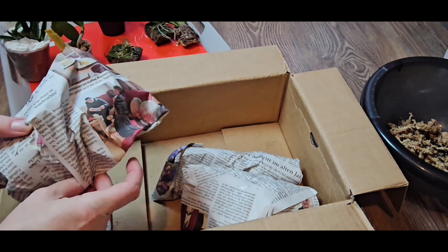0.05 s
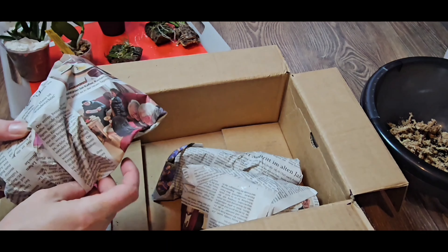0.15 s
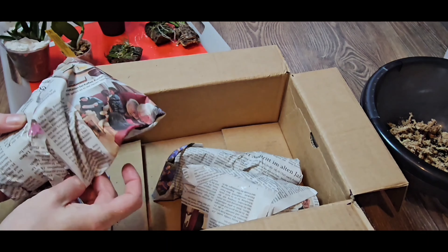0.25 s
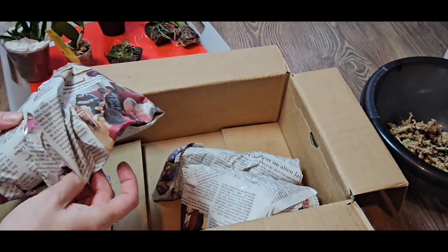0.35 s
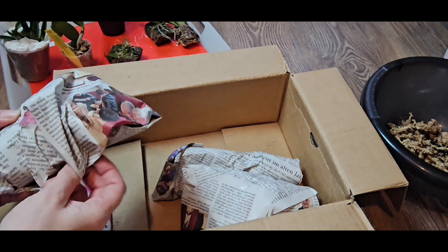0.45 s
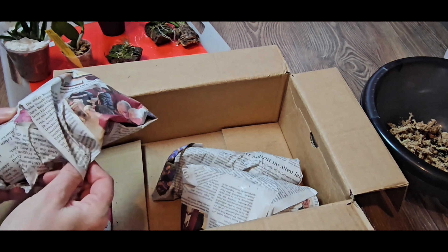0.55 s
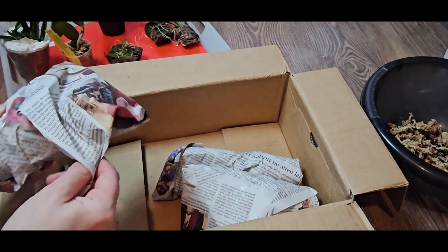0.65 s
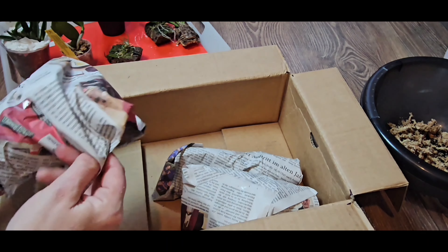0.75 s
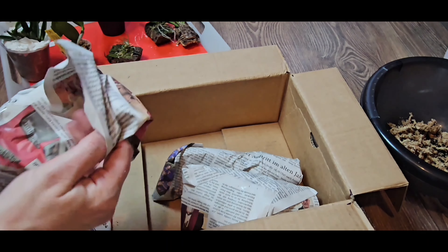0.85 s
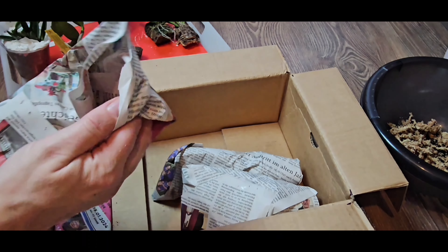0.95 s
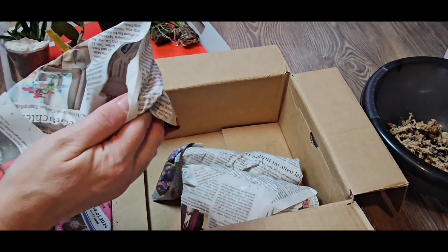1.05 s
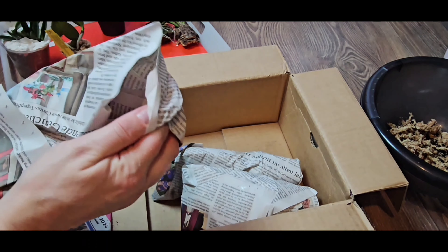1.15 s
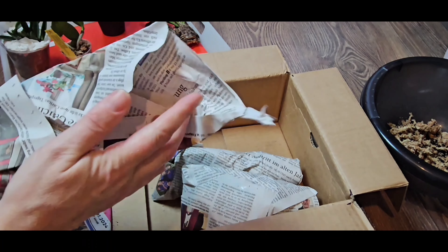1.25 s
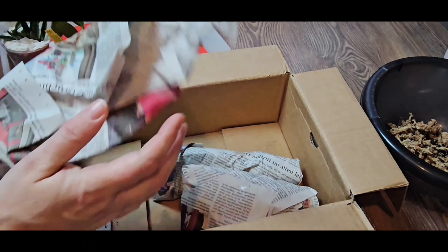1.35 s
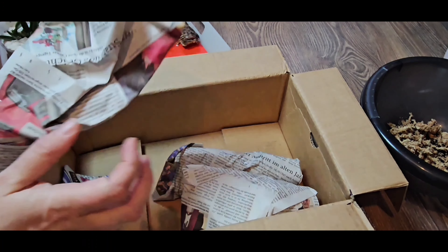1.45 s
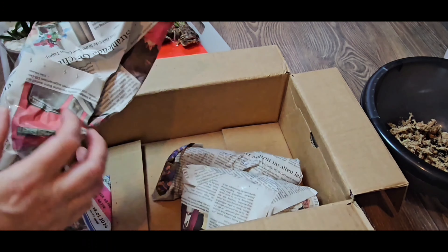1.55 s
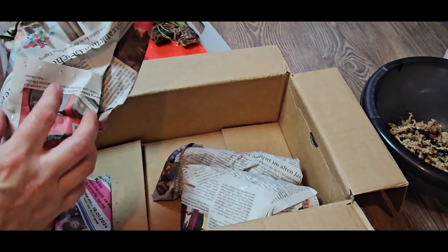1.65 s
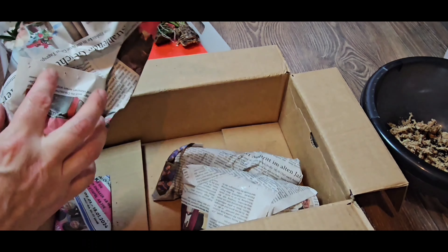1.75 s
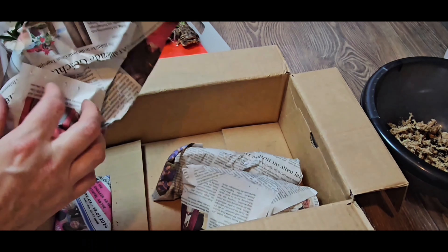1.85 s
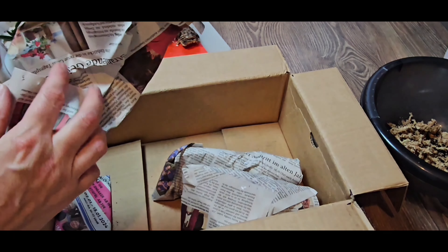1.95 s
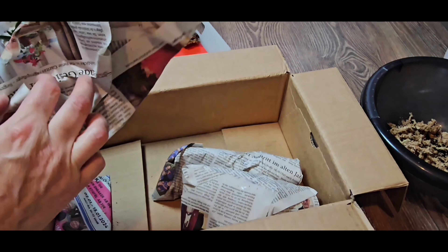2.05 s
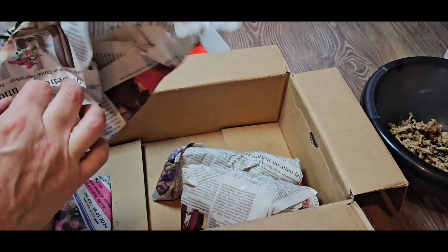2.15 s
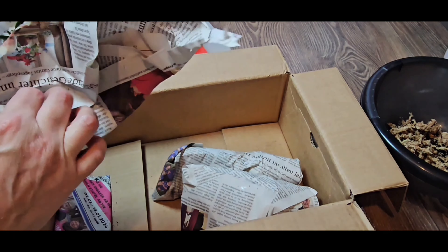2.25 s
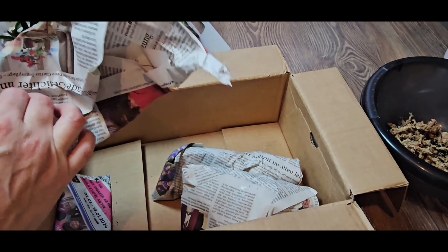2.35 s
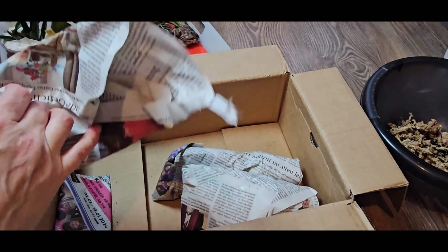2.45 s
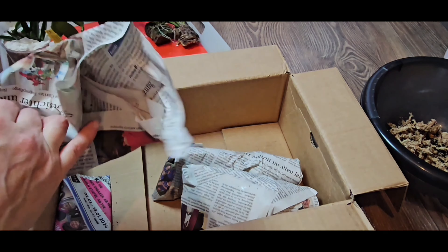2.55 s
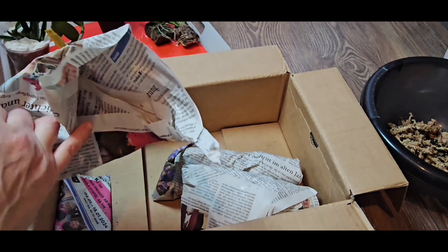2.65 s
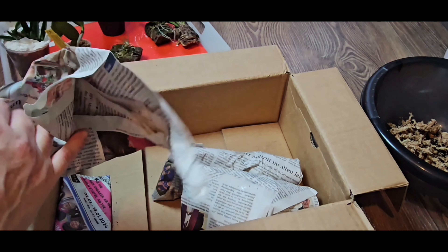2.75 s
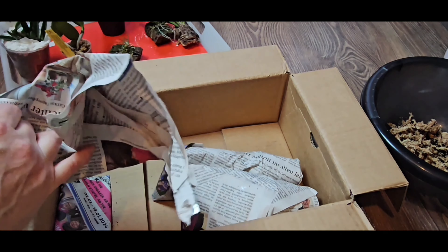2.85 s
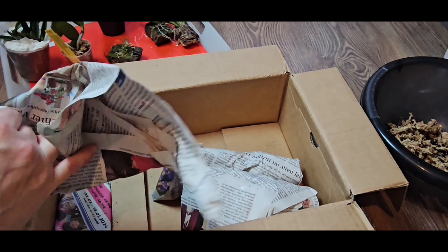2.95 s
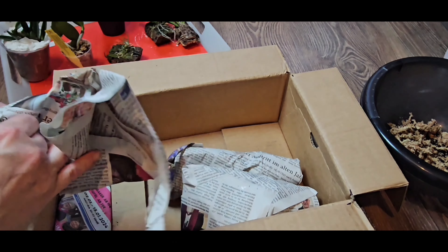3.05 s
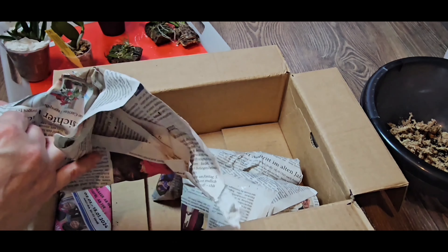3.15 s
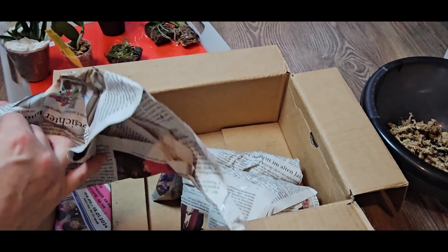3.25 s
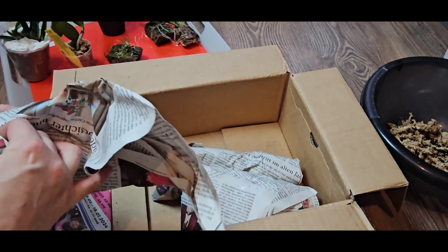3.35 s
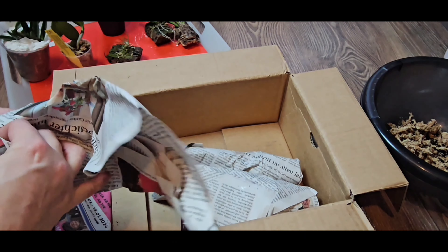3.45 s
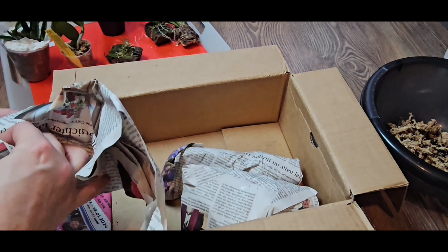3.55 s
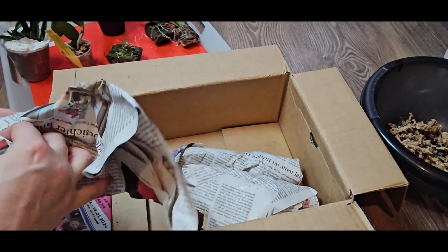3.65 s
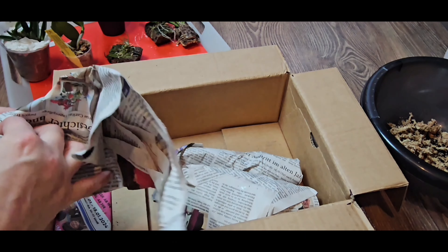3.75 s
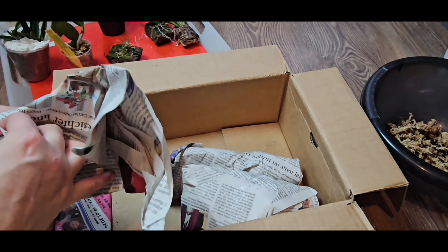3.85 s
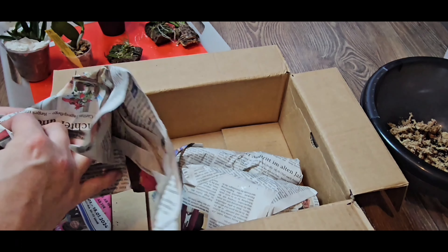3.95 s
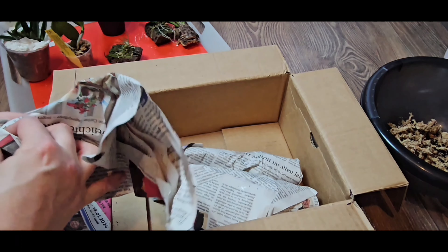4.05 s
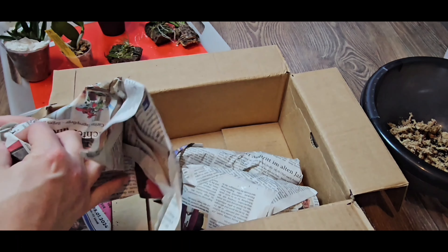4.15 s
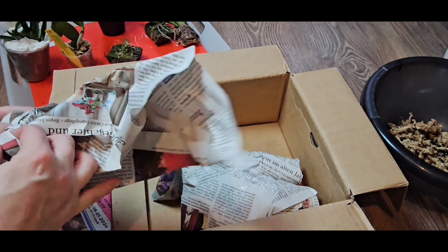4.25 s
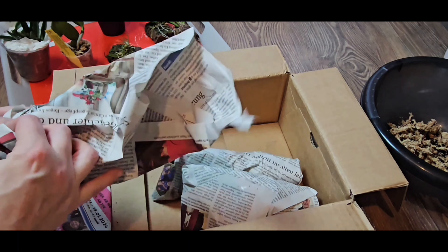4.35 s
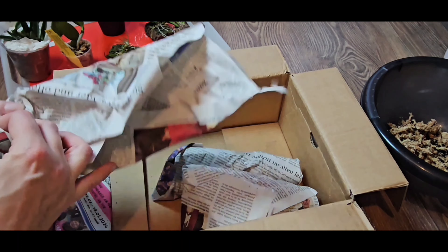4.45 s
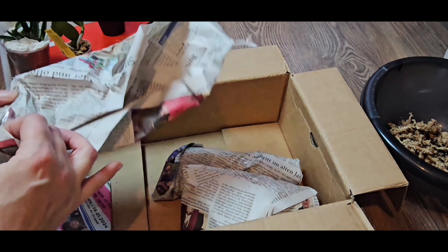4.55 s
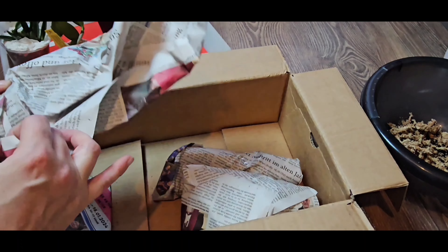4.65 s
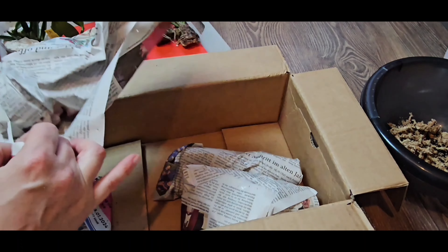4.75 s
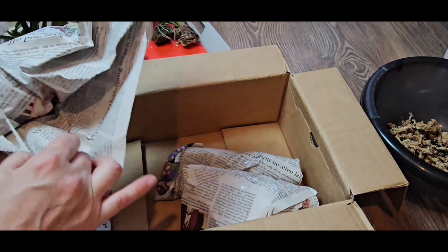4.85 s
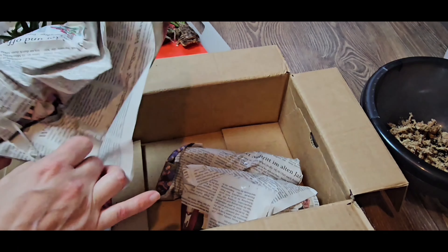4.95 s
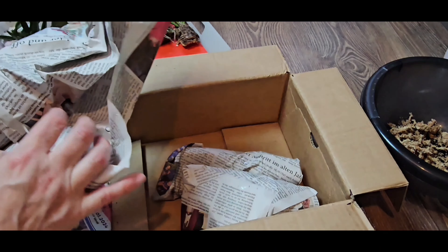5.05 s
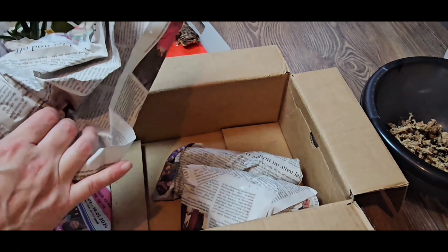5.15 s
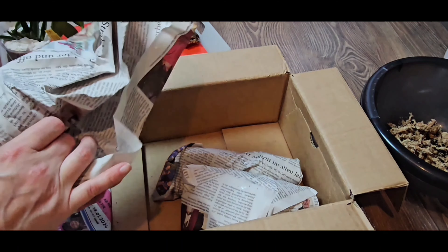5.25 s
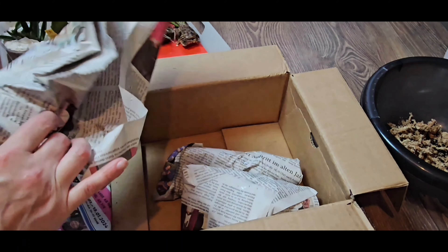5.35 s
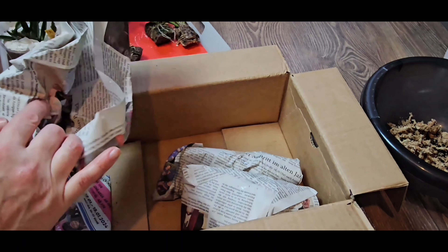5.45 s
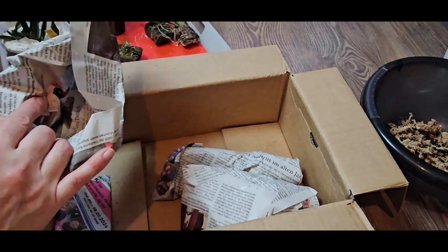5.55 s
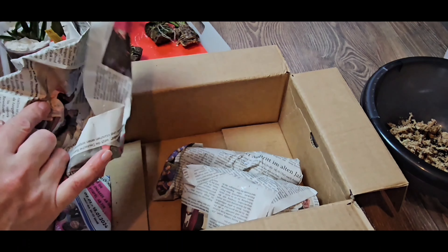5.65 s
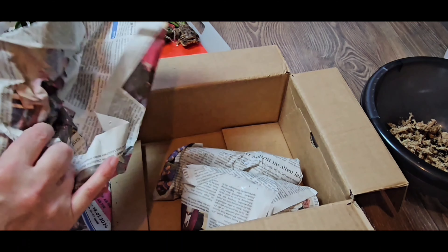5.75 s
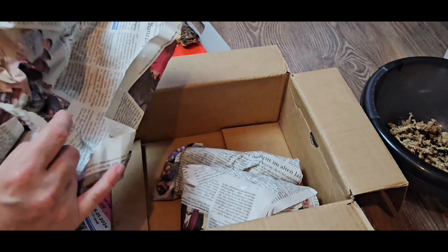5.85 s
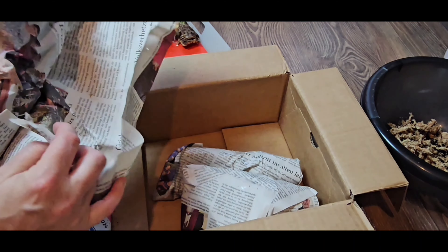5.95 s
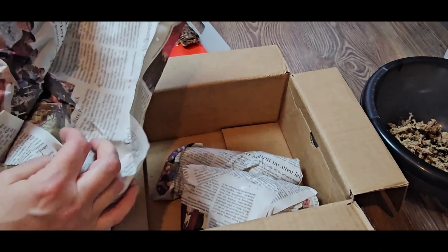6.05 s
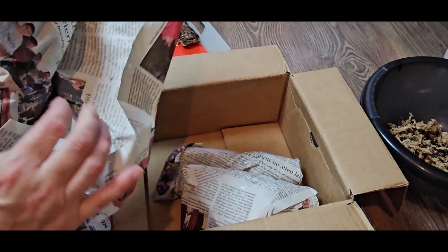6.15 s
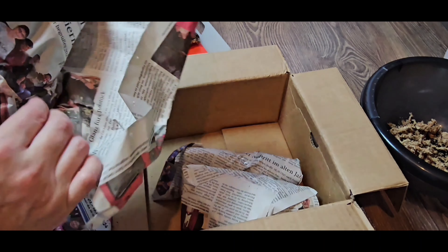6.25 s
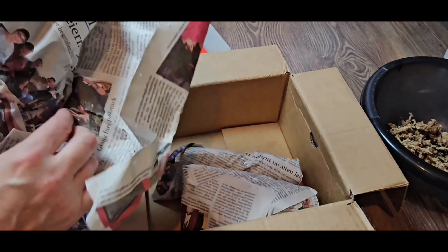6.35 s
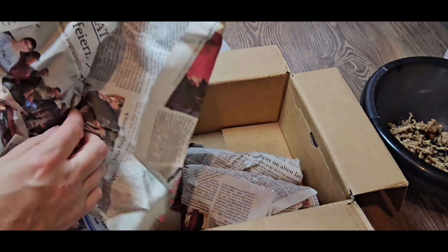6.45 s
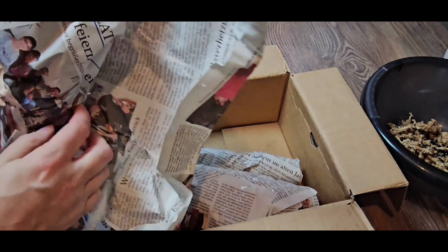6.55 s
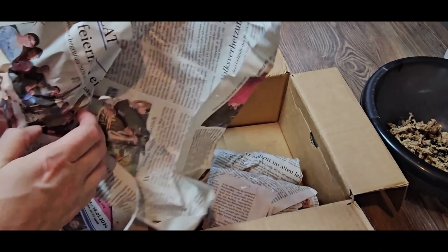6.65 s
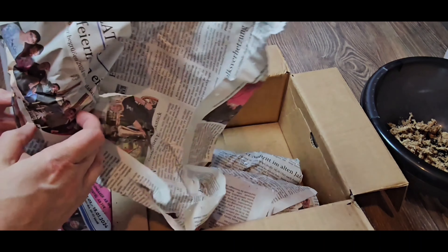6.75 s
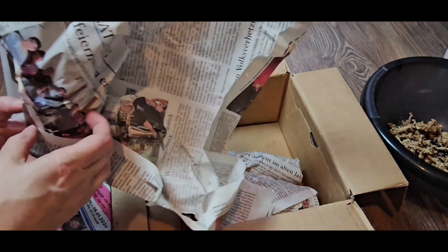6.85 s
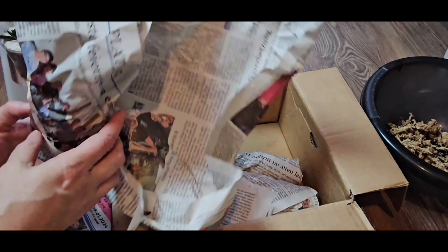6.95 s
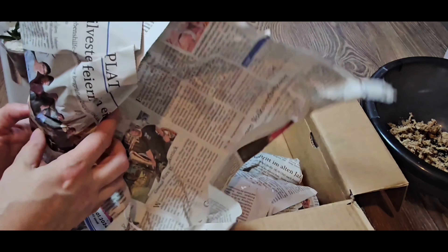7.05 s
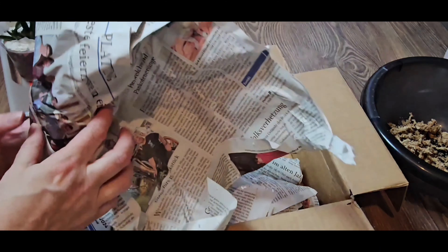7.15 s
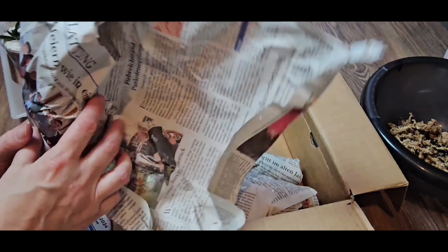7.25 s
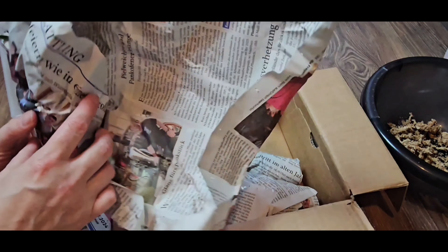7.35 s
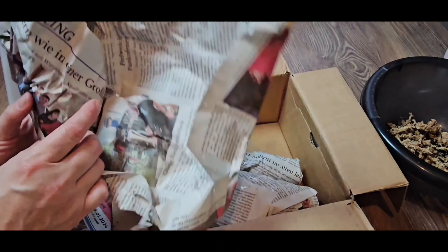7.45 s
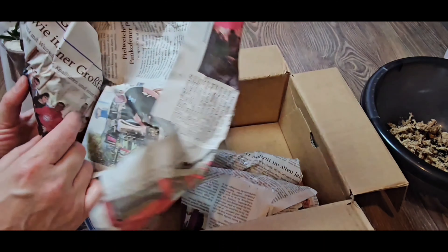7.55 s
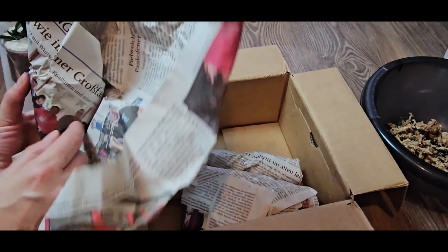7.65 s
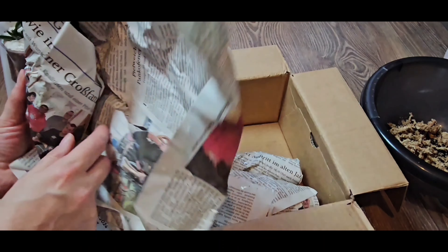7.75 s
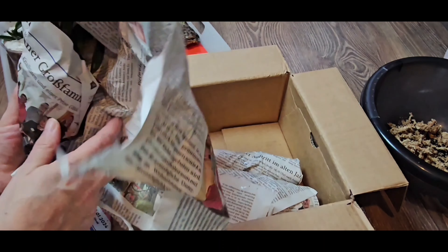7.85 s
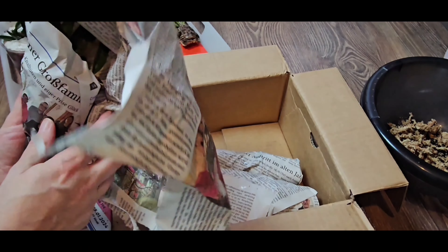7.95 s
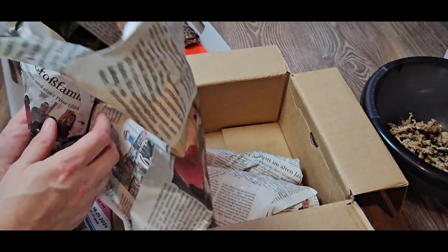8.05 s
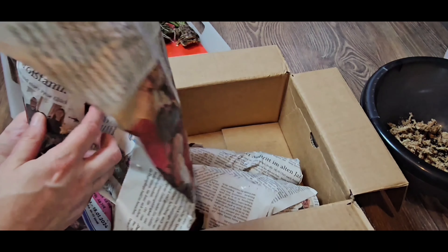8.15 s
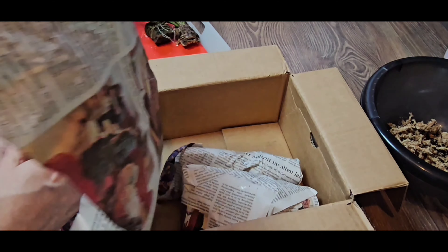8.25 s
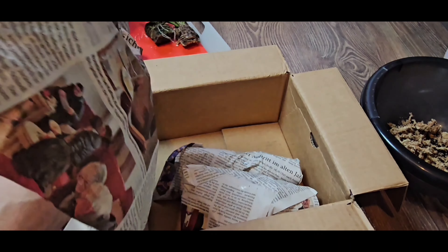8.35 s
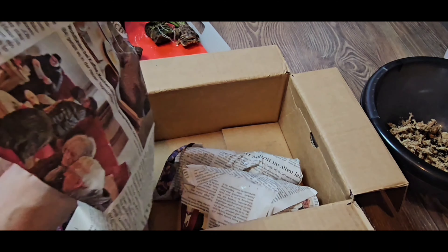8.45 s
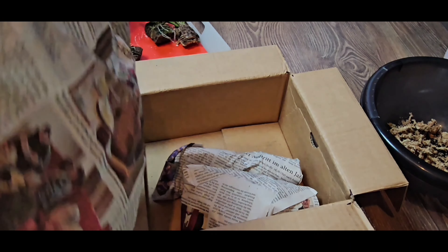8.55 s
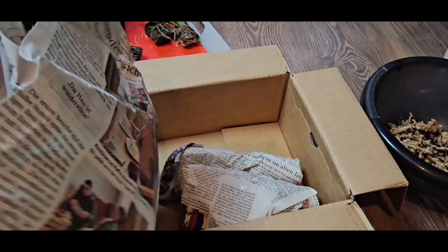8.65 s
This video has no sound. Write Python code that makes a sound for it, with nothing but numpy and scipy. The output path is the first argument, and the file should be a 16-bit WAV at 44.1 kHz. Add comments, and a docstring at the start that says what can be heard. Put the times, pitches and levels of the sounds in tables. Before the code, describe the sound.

Irregular handfuls of crinkling paper, first short squeezes, a quiet gap, then denser rustling with a few soft dull bumps of the bundle. A tiny tear zips by; later a strong pull rips and flutters the sheet, followed by a sinking hollow whoosh and fine rasp. Snapping and rustling continue to the end. Close, dry, centred indoor pickup with barely audible room hiss.

```python
"""A quiet room with faint noise and a thin high whine: close by, hands unwrap a potted plant from newspaper.
Dense, clustered buckles ring small facets, folds and wide panels of the sheet over a grain of rubbing fibres.
Stiff creases snap and wide folds pop as short noise bursts through resonances; layers slide, a few fibres tear.
Once the sheet is yanked free: a rip and flutter, then a swing of noise with a sinking hollow note and a rasp. A
few soft low thuds sound now and then, and the room answers with a diffuse decaying tail."""
import sys
import numpy as np
from scipy import signal
from scipy.fft import rfft, irfft, next_fast_len
from scipy.io import wavfile
from scipy.ndimage import uniform_filter1d, map_coordinates

SR = 44100
rng = np.random.default_rng(int(sys.argv[2]) if len(sys.argv) > 2 else 0)


def to_wav(sig):
    """Store sig (one row per channel, or 1-D mono) as 16-bit WAV at the path in sys.argv[1].

    Samples outside -1..1 are clipped; the rate is SR.
    """
    pcm = np.clip(np.atleast_2d(sig), -1, 1) * 32767
    pcm = np.round(pcm).astype(np.int16)
    wavfile.write(sys.argv[1], SR, pcm.T)  # frames by channels


N = 383978


def amp(db):
    """Decibels to gain."""
    return 10 ** (np.asarray(db) / 20)


def decibels(gain):
    """Gain to decibels."""
    return 20 * np.log10(gain)


def unit(x):
    """Scale to rms 1."""
    return x / np.sqrt(np.mean(x ** 2) + 1e-20)


def along(points, hz):
    """Read (frequency, value) points on a log frequency axis."""
    f, v = np.transpose(points)
    return np.interp(np.log(hz + 1), np.log(f), v)


def wobble(rate):
    """A smooth random curve through rate knots a second."""
    knots = rng.standard_normal(int(N * rate / SR) + 4)
    return map_coordinates(knots, [np.arange(N) * rate / SR], order=2)


def coloured(x, gain, size=2048):
    """Causal minimum-phase filter with the given gain over frequency."""
    cepstrum = irfft(np.log(np.maximum(gain(np.fft.rfftfreq(size, 1 / SR)), 1e-6)))
    cepstrum[1:size // 2] *= 2
    cepstrum[size // 2 + 1:] = 0
    impulse = irfft(np.exp(rfft(cepstrum)))
    return signal.fftconvolve(x, impulse)[:len(x)]


# colour of the room's background, overall level set apart: pitch_hz [Hz], density_db [dB per Hz]
BACKGROUND_COLOUR = [(25, -27), (70, 3), (130, 3.5), (300, -0.5), (1000, -10.5), (4000, -13.5),
                     (10000, -15), (15500, -14)]


def background(level_db=-77, whine_db=-86.0, whine_hz=13500, width_hz=150):
    """Faint room noise with a narrow noise band as a thin high whine."""
    air = coloured(rng.standard_normal(N), lambda f: amp(along(BACKGROUND_COLOUR, f)))
    whine = coloured(rng.standard_normal(N), lambda f: 1 / (1 + ((f - whine_hz) / width_hz) ** 2))
    return amp(level_db) * unit(air) + amp(whine_db) * unit(whine)


# how long the room rings: pitch_hz [Hz], decay_t60_s [s]
ROOM_DECAY = [(200, 0.19), (2000, 0.06), (12000, 0.9)]


def room(x):
    """A diffuse answer of the room: a noise tail in which each frequency dies at its own speed."""
    hz, t, z = signal.stft(rng.standard_normal(SR // 2), SR, nperseg=256)
    fade = amp(-60 * t / along(ROOM_DECAY, hz)[:, None])
    tail = signal.istft(z * fade, SR, nperseg=256)[1]
    delayed = np.pad(x, (SR // 250, 0))  # 4 ms before the answer starts
    return signal.fftconvolve(delayed, tail / np.linalg.norm(tail))[:N]


# what the crumpled sheet radiates, relative colour only: pitch_hz [Hz], density_db [dB per Hz]
SHEET_COLOUR = [(60, -11), (200, -10.5), (350, 0.5), (480, -2.5), (620, 1.5), (800, -3.5), (1050, -6.5),
                (1600, 0.5), (2500, -2), (5700, 4), (7300, 1.5), (9500, -14.5), (15500, -10.5)]


def sheet_gain(f):
    """Gain of the sheet as a radiator over frequency."""
    return amp(along(SHEET_COLOUR, f))


def sheet(x, lo_hz, hi_hz, order=14):
    """Sound given off by the parts of the sheet that ring between two frequencies."""
    def band(f):
        low_side = 1 + (lo_hz / (f + 1)) ** (2 * order)
        high_side = 1 + (f / hi_hz) ** (2 * order)
        return 1 / np.sqrt(low_side * high_side)
    return coloured(x, lambda f: sheet_gain(f) * band(f))


def crease(slip, hz, width_hz, crack_db):
    """A slip rings one patch of paper over a broad crack; it carries the energy of 4 ms at rms 1."""
    def patch(f):
        resonance = 1 / (1 + ((f - hz) / width_hz) ** 2)
        above_bass = f ** 2 / (f ** 2 + (hz / 10) ** 2)  # a small patch gives off little bass
        return resonance + amp(crack_db) * above_bass
    ring = coloured(slip, lambda f: sheet_gain(f) * patch(f))
    return np.sqrt(SR / 250) * ring / np.linalg.norm(ring)


# soft low knocks: start_s [s], level_db [dB, before gain_db]
BUMP_EVENTS = [(1.358, -49), (1.439, -53.5), (3.02, -45.5), (8.007, -47.5)]


def bumps(gain_db=-5, rise=0.0022, t60=0.25, lo_hz=110, hi_hz=300):
    """A soft low thud of decaying noise."""
    t = np.arange(N) / SR
    thud = unit(sheet(rng.standard_normal(N), lo_hz, hi_hz, order=3))
    envelope = np.zeros(N)
    for start_s, level_db in BUMP_EVENTS:
        envelope += np.clip((t - start_s) / rise, 0, 1) * amp(level_db - 60 * np.abs(t - start_s) / t60)
    return amp(gain_db) * envelope * thud


# the loose sheet swings through the air: its time, level and hollow note from first to last
SWING_S, SWING_LENGTH_S, SWING_DB, SWING_FROM_HZ, SWING_TO_HZ = 4.56, 0.5, -55, 610, 354


def swing(octaves=0.34, rise=0.011, fade_db_per_s=110):
    """The swinging sheet is a band of noise; its note sinks as more of it unfolds."""
    hz, t, z = signal.stft(rng.standard_normal(N), SR, nperseg=1024)
    note = np.interp(t, [SWING_S, SWING_S + SWING_LENGTH_S], [SWING_FROM_HZ, SWING_TO_HZ])
    octaves_off = np.log2((hz[:, None] + 1) / note)
    hum = signal.istft(z * np.exp(-.5 * (octaves_off / octaves) ** 2), SR, nperseg=1024)[1][:N]
    age = np.arange(N) / SR - SWING_S
    db = SWING_DB - fade_db_per_s * np.maximum(age - SWING_LENGTH_S, 0)
    return np.clip(age / rise, 0, 1) * amp(db) * unit(hum)


# how the fingers close on the paper, and how it relaxes after the squeeze
CLOSE_S, RELAX_DB_PER_S = .027, 129


def squeeze(age, length, build_db):
    """Gain of one grip: the fingers close, the force moves by build_db (eases if negative), then lets go."""
    closing = np.clip(age / CLOSE_S, 0, 1)
    slack = np.clip(1 - age / np.abs(length), 0, 1)
    return closing * amp(-build_db * slack - RELAX_DB_PER_S * np.maximum(age - length, 0))


def scrape(level_db=-52, rough_db=4, lo_hz=5200, hi_hz=16000, length=0.47):
    """The swinging sheet drags over the bundle: a fine, bright noise rasp, randomly rough in level."""
    age = np.arange(N) / SR - SWING_S
    rough = amp(rough_db * (wobble(500) + wobble(60)))
    rasp = sheet(rng.standard_normal(N), lo_hz, hi_hz, order=4) * rough
    return amp(level_db) * squeeze(age, length, 0) * unit(rasp)


def tear(middle_s=2.4983, length=0.0022, level_db=-37, note_hz=6700, width_hz=600, crack_db=-15):
    """A few fibres rip in one tiny bright zip, a bell-shaped burst of noise."""
    age = np.arange(N) / SR - middle_s
    slip = rng.standard_normal(N) * np.exp(-(age / length) ** 2)
    return amp(level_db) * crease(slip, note_hz, width_hz, crack_db)


# wide folds popping over, each with its own hollow note:
# start_s [s, before a 1.2 ms delay], level_db [dB, before gain_db], pitch_hz [Hz]
POP_EVENTS = [(0.177, -39.5, 616), (0.74, -39.5, 770), (0.971, -46, 2030), (1.236, -36.5, 620),
              (1.327, -36.5, 1360), (1.358, -29, 990), (1.423, -38, 402), (1.996, -49, 1700),
              (2.027, -47, 1740), (2.299, -36, 645.3), (2.767, -40, 1730), (2.889, -32.5, 662),
              (2.946, -38, 552.4), (3.014, -29.5, 398), (3.093, -34, 606), (3.523, -42, 720),
              (3.616, -34.5, 1570), (3.655, -31, 617), (4.575, -32, 626), (4.653, -33, 790),
              (4.678, -30, 2140), (4.941, -37.5, 371), (5.001, -35, 406), (5.19, -41.5, 1950),
              (5.205, -34.5, 436), (5.683, -35.5, 536), (5.927, -33.5, 627), (6.871, -42.5, 1750),
              (6.901, -39, 598), (7.116, -41, 1900), (7.209, -40, 1530), (8.051, -35.5, 586),
              (8.081, -39, 526.7), (8.107, -40, 350), (8.3, -34.5, 1738), (8.317, -38.5, 705),
              (8.351, -38.5, 610)]
FOLD_T60 = .022  # s, decay of the shiver


def pops(gain_db=-8.0, crack_db=-9, kick_db=24):
    """A wide fold flips over with one kick and a brief shiver of noise."""
    t = np.arange(SR // 10) / SR
    out = np.zeros(N + len(t))
    for start_s, level_db, pitch_hz in POP_EVENTS:
        shiver = rng.standard_normal(len(t)) * amp(-60 * t / FOLD_T60)
        kick = amp(kick_db) * (t == 0)
        soft = coloured(shiver + kick, lambda f: f / (f + 200) / (1 + (f / 3200) ** 4))
        pop = crease(soft, pitch_hz, pitch_hz / 4, crack_db)
        out[int((start_s + .0012) * SR):][:len(t)] += amp(level_db + gain_db) * pop
    return out[:N]


# stiff creases snapping through: start_s [s], level_db [dB, before gain_db]
SNAP_EVENTS = [(0.061, -52), (0.158, -44.5), (0.261, -49.0), (0.336, -44.5), (0.404, -48.5), (0.425, -41),
               (0.502, -36), (0.633, -42.5), (0.701, -42), (0.743, -36), (0.787, -46), (0.971, -48.5),
               (1.135, -43.5), (1.168, -48.0), (1.238, -47.5), (1.279, -49), (1.361, -32), (1.413, -40),
               (1.57, -51), (1.9, -53.5), (1.996, -50.5), (2.13, -54), (2.3, -45), (2.703, -37),
               (2.768, -44), (2.801, -37.5), (2.827, -42), (2.887, -36), (2.89, -37), (2.917, -39.5),
               (3.016, -51), (3.092, -44.5), (3.256, -43.5), (3.344, -46.0), (3.385, -45), (3.511, -52),
               (3.522, -50), (3.567, -49.5), (3.578, -48.5), (3.618, -43.5), (3.656, -43), (3.838, -49),
               (3.929, -50), (4.135, -54), (4.154, -51.5), (4.24, -52), (4.288, -56), (4.324, -43.5),
               (4.587, -39), (4.624, -35.5), (4.655, -30), (4.679, -46), (4.709, -42.5), (4.887, -41),
               (5.041, -42.5), (5.091, -39.5), (5.192, -46), (5.301, -47), (5.403, -42.5), (5.46, -46.5),
               (5.605, -44.0), (5.636, -40.5), (5.684, -39.0), (5.709, -43.5), (5.741, -45.0),
               (5.771, -42.5), (5.794, -48), (5.85, -36.5), (5.895, -37), (6.037, -45), (6.142, -44.5),
               (6.473, -51.5), (6.54, -48.5), (6.622, -50.5), (6.684, -44.5), (6.84, -40), (6.904, -38.5),
               (7.117, -38), (7.211, -47), (7.224, -47.0), (7.598, -46), (7.671, -47), (7.718, -46),
               (7.737, -45), (7.806, -47.0), (7.821, -48.0), (7.894, -48.5), (7.923, -43), (7.955, -35.5),
               (7.959, -35.0), (7.987, -49), (8.013, -38.5), (8.068, -46), (8.111, -36.5), (8.256, -43),
               (8.401, -36), (8.659, -46.5)]
FACET_HZ, FACET_OCTAVES = 5320, 0.21  # the facet a snap rings: usual pitch and its scatter


def snaps(gain_db=0.75, rise=0.00008, length=0.0021, width_hz=1000, crack_db=-11):
    """A stiff crease gives way for a few milliseconds and stops; its facet rings over a broad crack."""
    t = np.arange(SR // 20) / SR
    out = np.zeros(N + len(t))
    envelope = (1 - np.exp(-t / rise)) ** 2 * np.exp(-(t / length) ** 2)
    for start_s, level_db in SNAP_EVENTS:
        slip = rng.standard_normal(len(t)) * envelope
        hz = FACET_HZ * 2 ** (FACET_OCTAVES * rng.standard_normal())
        out[int(start_s * SR):][:len(t)] += amp(level_db + gain_db) * crease(slip, hz, width_hz, crack_db)
    return out[:N]


def ticks(effort_db, centre_hz, most_db, t60, count=420):
    """Small creases click above the rubbing, each at its own pitch; a light touch frees few of them."""
    t = np.arange(SR // 50) / SR
    out = np.zeros(N + len(t))
    places, chances = rng.integers(N, size=count), rng.random(count)
    sizes, pitches = rng.uniform(-1.3, 1, (2, count))
    slips = rng.standard_normal((count, len(t))) * amp(-60 * t / t60)
    for at, chance, size, pitch, slip in zip(places, chances, sizes, pitches, slips):
        db = min(effort_db[at], (effort_db[at] + most_db) / 2)  # half the growth above most_db
        if chance < amp(db - most_db):
            hz = centre_hz * 2 ** (pitch / 2)
            out[at:][:len(t)] += amp(db + 4 * size) * crease(slip, hz, hz / 5, -11)
    return out[:N]


# handfuls of paper, levels before the trims in rustle(): start_s [s], length_s [s],
# facet_db [dB, small facets at the end], build_db [dB, change during the squeeze],
# fold_db [dB re facets], panel_db [dB re folds], slide_db [dB re facets]
HANDFUL_EVENTS = [(-0.032, 0.027, -46.5, 5.0, -9, 0.5, -11), (0.13, 0.034, -48.0, 9, -9, 2.5, -15),
                  (0.234, 0.069, -52.0, 9, -6.5, -6, -8), (0.384, 0.114, -52.5, -2.0, -9.5, -4, -7.5),
                  (0.559, 0.087, -45.0, 25.0, -7, -3.5, -8.5), (0.709, 0.037, -43.0, 4.5, -6, -3.5, -6.5),
                  (0.883, 0.206, -60.5, 2.0, -9.5, -6.5, -18), (1.103, 0.182, -51.0, 9.0, -3.5, -1, -14.5),
                  (1.329, 0.033, -43.5, 13.5, -3.5, 0.5, -9.5), (1.807, 0.115, -62.0, 1, -15.5, 10, -16),
                  (1.985, 0.13, -64, -6, -7, -4, -21), (2.201, 0.138, -54, 7.0, -9.5, -1.5, -15),
                  (2.472, 0.237, -53.0, 7.5, -29, 4, -9), (2.622, 0.287, -49, 9, -3, -3.5, -13),
                  (2.95, 0.072, -45.0, 17.5, -4, 1.5, -18.5), (3.198, 0.061, -52, 12, -3.5, 1, -12.5),
                  (3.307, 0.083, -53.5, 7.5, -0.5, -6.5, -14), (3.491, 0.159, -52.0, 11.0, -4.5, 0.5, -18),
                  (3.737, 0.102, -58.5, 13.0, -16.5, -1, -31), (3.904, 0.021, -55.5, 14, -12, -0.5, -12),
                  (4.075, 0.367, -57.0, 12.5, -7.5, -1, -22), (4.553, 0.127, -41.5, 2, -5, -3, -11.5),
                  (4.688, 0.313, -47, 6.0, -6.5, 1.5, -7), (5.049, 0.013, -45.5, 1, -9, -2, -8),
                  (5.153, 0.035, -48.5, 4.0, -5, -2, -20), (5.385, 0.212, -55.5, -1, -13.5, 0.5, -16),
                  (5.575, 0.126, -48.0, 8.0, -6.5, 0, -11), (5.772, 0.089, -50.0, 9.0, -9.0, -11, -12),
                  (5.875, 0.062, -43.5, 3.0, -6, 2, -10), (6.109, 0.142, -61.5, -7.0, -6.5, -3, -14.5),
                  (6.388, 0.152, -60.0, 13.5, -10.5, 4, -21), (6.601, 0.097, -56.0, 1, -10.5, -2.5, -16),
                  (6.747, 0.157, -48.0, 20.5, -7, 2, -12.5), (7.04, 0.216, -56.0, 1.5, -7, -1.5, -24),
                  (7.262, 0.082, -54.5, 8.5, -9, 5.5, -11), (7.428, 0.181, -55.0, 7.0, -7, -3.5, -22),
                  (7.695, 0.222, -57, -5.0, -8.5, 3, -14), (7.955, 0.16, -53, -2.5, -5, 3, -10.5),
                  (8.165, 0.229, -51.5, 7.5, -3.5, -3, -11.5), (8.474, 0.234, -57.5, 11.0, -9.5, 1, -20)]
# the held bundle is never quite still: its facets, and all its other parts re facets
TOUCH_DB, TOUCH_BODY_DB = -71.5, -16


def hands():
    """Level in dB of facets, folds, panels and sliding: the handfuls add up over the light hold."""
    t = np.arange(N) / SR
    clock = np.linspace(0, t[-1], N // 64)  # coarse control times
    columns = np.transpose(HANDFUL_EVENTS)[:, :, None]
    start_s, length_s, facet_db, build_db, fold_db, panel_db, slide_db = columns
    push = amp(facet_db) * squeeze(clock - start_s, length_s, build_db)

    def level(part_db, rest_db):
        power = np.sum((push * amp(part_db)) ** 2, axis=0) + amp(rest_db) ** 2
        return np.interp(t, clock, 10 * np.log10(power))

    restless_db = TOUCH_DB + 2 * wobble(10)[::64][:len(clock)]
    body_db = TOUCH_DB + TOUCH_BODY_DB
    facets, folds = level(0, restless_db), level(fold_db, body_db)
    return facets, folds, level(fold_db + panel_db, body_db), level(slide_db, body_db)


# the sheet is yanked free: timing, then level and t60 (s) of the rip and of the longer flutter
YANK_S, YANK_RISE_S, YANK_HOLD_S = 4.383, 0.011, 0.021
YANK_DB, YANK_T60, FLUTTER_DB, FLUTTER_T60 = -35.5, 0.086, -36, .42


def yanked():
    """Gain of the sudden pull: a short rip with a flutter that outlasts it."""
    age = np.maximum(np.arange(N) / SR - YANK_S, 0)
    after = np.maximum(age - YANK_HOLD_S, 0)
    rip = amp(YANK_DB - 60 * after / YANK_T60)
    flutter = amp(FLUTTER_DB - 60 * age / FLUTTER_T60)
    return np.minimum(age / YANK_RISE_S, 1) * (rip + flutter)


def buckles(effort_db, rate, growth_db, cluster_db, spread_db):
    """Sample indices and heights of small buckles: more effort, more of them, with clustered heights."""
    density = rate * amp(growth_db * (effort_db - np.mean(effort_db)) / 10)
    at = np.flatnonzero(rng.random(N) < density / SR)
    cluster = cluster_db * wobble(130)[at]
    own = spread_db * np.minimum(rng.exponential(size=len(at)), np.pi)
    return at, amp(cluster + own)


def rings(at, height, lo_hz, hi_hz, t60, drift=0.355, scatter=0.204):
    """A short damped ring for every buckle; the pitch drifts as the paper changes shape."""
    t = np.arange(int(t60 * SR) + 2) / SR
    place = (drift * wobble(12)[at] + scatter * rng.standard_normal(len(at))) % 1
    hz = lo_hz + (hi_hz - lo_hz) * place[:, None]
    waves = height[:, None] * np.sin(2 * np.pi * hz * t) * 1000 ** (-t / t60)
    samples = at[:, None] + np.arange(len(t))
    return np.bincount(samples.ravel(), waves.ravel(), N)[:N]


def steady(x, span):
    """Level to about rms 1 over span seconds: hands supply energy evenly, creases release it in jerks."""
    power = uniform_filter1d(uniform_filter1d(x ** 2, int(span * SR)), int(span * SR / 2))
    return x / np.sqrt(np.abs(power) + 1e-12)


# hollow colour of the lightly touched bundle, before levelling: pitch_hz [Hz], gain_db [dB]
HOLLOW_COLOUR = [(330, -3.5), (620, 4.5), (1050, -4), (1700, 3), (2600, -3.5), (3900, -3.5), (5900, -3.5),
                 (9000, -12)]


def crumple(at, height, opened, lo_hz, hi_hz, t60, rub_db):
    """Buckles ring one size of paper patch, over the fine noise grain of rubbing fibres."""
    own = height * amp(1.4 * rng.standard_normal(len(at)))
    grains = unit(rings(at, own, lo_hz, hi_hz, t60))
    rubbing = amp(rub_db) * rng.standard_normal(N)
    free = sheet(grains + rubbing, lo_hz, hi_hz)
    hollow = coloured(free, lambda f: amp(along(HOLLOW_COLOUR, f)))
    return steady(opened * free + (1 - opened) * hollow, span=0.053)


# the sheet's resonances shift as it bends: scale of the random gain (dB), knots a second and an octave
SHIFT_DB, SHIFTS_PER_S, SHIFTS_PER_OCTAVE = 3, 45, 3


def reshaped(x):
    """Resonances come and go as the paper changes shape: a smooth random gain over time and pitch."""
    hz, t, z = signal.stft(x, SR, nperseg=256)
    pitch_knots = SHIFTS_PER_OCTAVE * np.log2(1 + hz / hz[2])
    place = np.meshgrid(pitch_knots, SHIFTS_PER_S * t, indexing="ij")
    knots = rng.standard_normal([int(p.max()) + 2 for p in place])
    field = map_coordinates(knots, place, order=2)
    return signal.istft(z * amp(SHIFT_DB * field), SR, nperseg=256)[1][:N]


BUSIEST_DB = -44  # beyond this effort the buckles come no faster, only harder
# wide panels gain (or lose) this many dB per dB of facet level above (or below) a firm squeeze
FIRM_DB, PANEL_GROWTH = -45.5, 0.089


def rustle():
    """The same buckles shake panels, folds and facets while the layers slide."""
    facet_db, fold_db, panel_db, slide_db = hands()
    panel_db = panel_db + PANEL_GROWTH * (facet_db - FIRM_DB)
    yank = yanked()
    # big movements open the bundle up
    opened = .5 + .5 * np.tanh((decibels(amp(panel_db) + yank) + 55.3) / 8)
    # a touch too light to bend the folds stirs only the smallest facets
    firm = .5 + .5 * np.tanh((fold_db + 78.0) / 8)
    effort_db = np.minimum(decibels(amp(facet_db) + yank), BUSIEST_DB)
    at, height = buckles(effort_db, rate=800, growth_db=5, cluster_db=3.5, spread_db=1.5)

    panels = crumple(at, height, opened, lo_hz=133.0, hi_hz=1003, t60=0.028, rub_db=3.0)
    panels *= amp(panel_db - 0.5) + amp(-9.5) * yank
    folds = crumple(at, height, opened, lo_hz=930, hi_hz=2940, t60=0.012, rub_db=11.0)
    folds *= amp(fold_db - 1.0) + amp(-7.0) * yank
    coarse = crumple(at, height, opened, lo_hz=2887, hi_hz=9600, t60=0.0055, rub_db=3.0)
    fine = crumple(at, height, opened, lo_hz=3850, hi_hz=7630, t60=0.0019, rub_db=6.0)
    facets = np.sqrt(firm) * coarse + np.sqrt(1 - firm) * fine
    facets = facets * amp(facet_db - 0.56) + coarse * yank
    slide = crumple(at, height, opened, lo_hz=7660, hi_hz=17300, t60=0.0021, rub_db=2.5)
    slide *= amp(slide_db) + amp(-8.5) * yank
    clicks = ticks(facet_db, centre_hz=4900, most_db=-53, t60=.003)
    return reshaped(panels + folds) + facets + slide + clicks


ROOM_DB, WIDTH_DB = -9.5, -20  # the room's answer in the middle and at the sides
QUIET_WIDTH_DB = -19.5  # side re middle of the background


def scene():
    """The paper is straight ahead; only the room and its background differ a little between the ears."""
    paper = bumps() + swing() + scrape() + tear() + pops() + snaps() + rustle()
    mid = background() + amp(ROOM_DB) * room(paper) + paper
    side = amp(QUIET_WIDTH_DB) * background() + amp(WIDTH_DB) * room(paper)
    return np.array([mid + side, mid - side])


TOP_HZ = 15900  # band limit


def record(dry):
    """Remove everything from the band limit upward."""
    size = next_fast_len(N + SR // 4)
    kept = np.fft.rfftfreq(size, 1 / SR) < TOP_HZ
    return irfft(rfft(dry, size) * kept, size)[:, :N]


dry = scene()
out = record(dry)
to_wav(out)
```